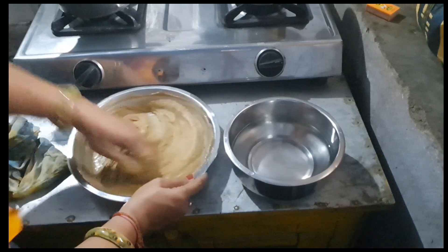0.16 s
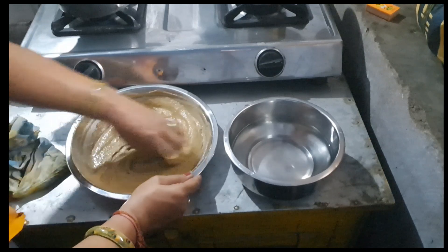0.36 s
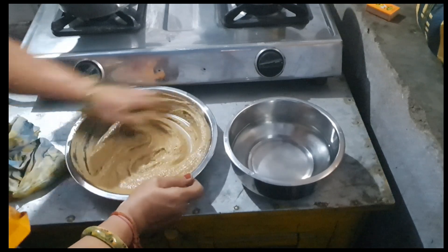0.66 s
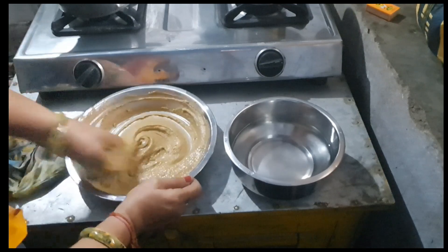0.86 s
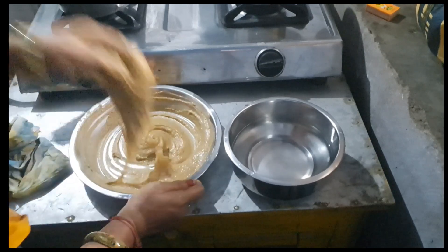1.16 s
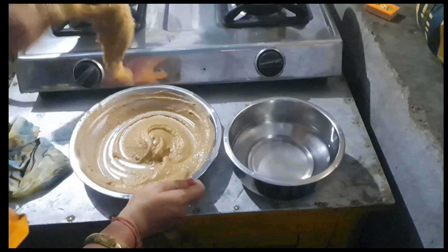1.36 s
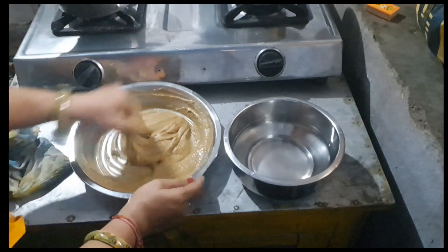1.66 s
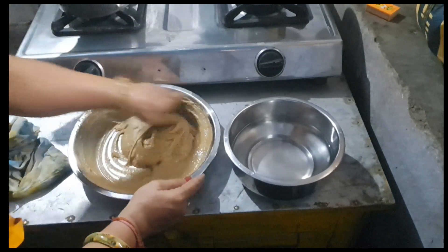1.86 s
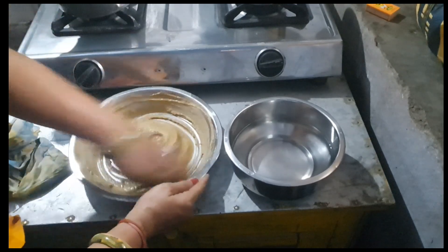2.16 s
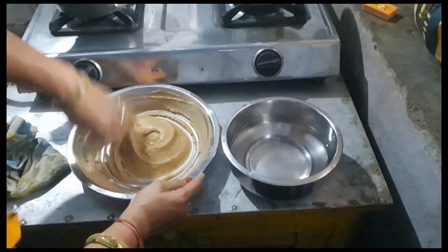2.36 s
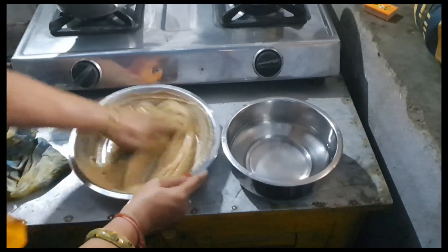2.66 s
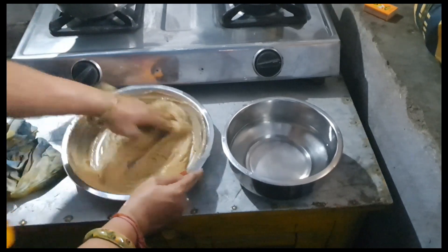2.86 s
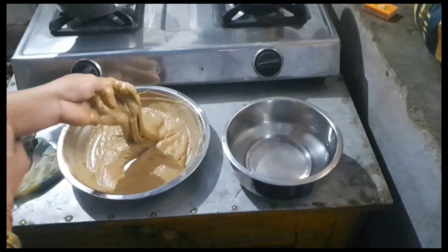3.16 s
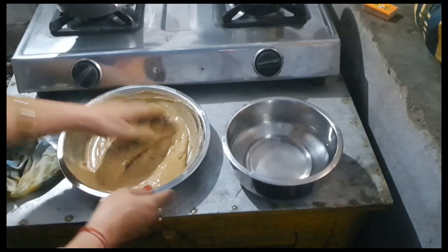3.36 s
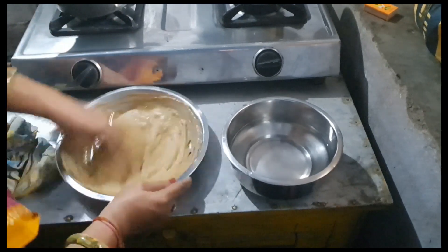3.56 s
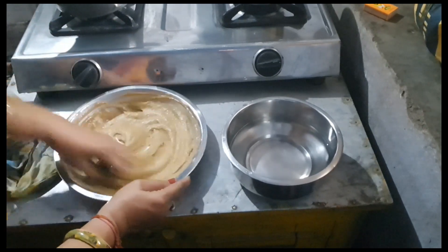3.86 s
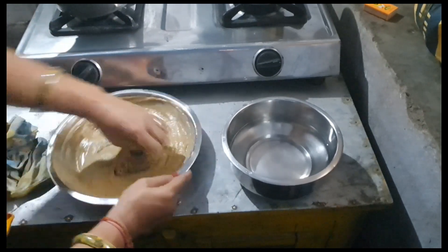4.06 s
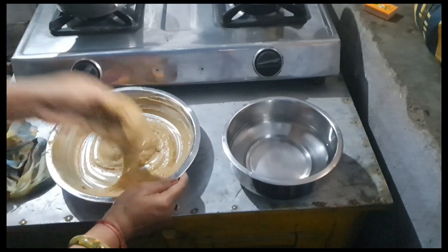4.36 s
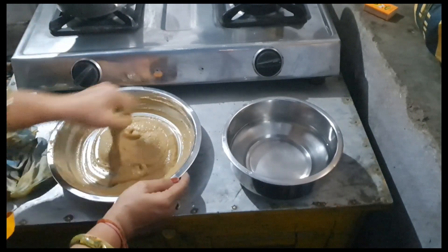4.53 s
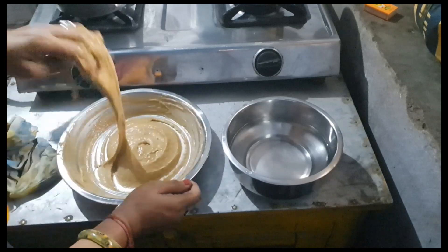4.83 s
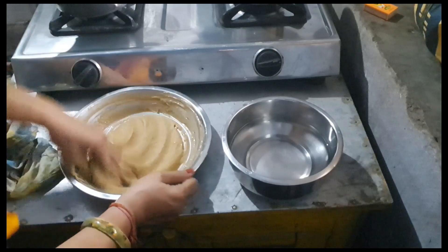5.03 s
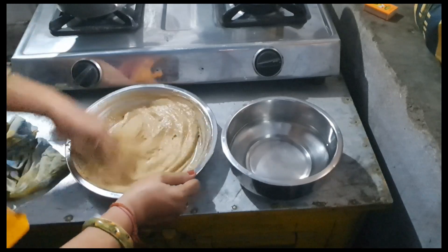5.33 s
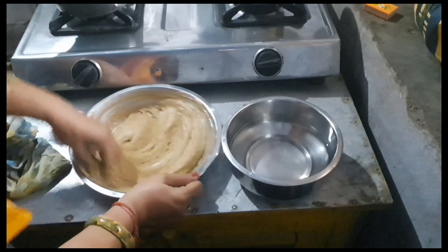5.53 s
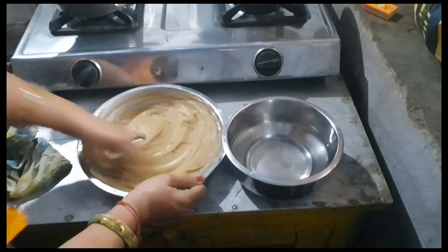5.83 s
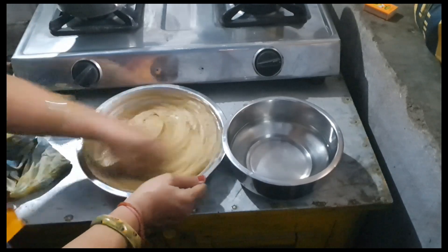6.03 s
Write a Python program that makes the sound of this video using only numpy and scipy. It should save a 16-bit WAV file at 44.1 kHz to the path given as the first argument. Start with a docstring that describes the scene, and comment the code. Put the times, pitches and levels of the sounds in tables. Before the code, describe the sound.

A hand works thick, wet batter in a steel bowl on a counter, heard close in stereo in a small, hard kitchen with faint room air. From 0 s soft plops, folds and thumps accompany a squishy, crackling stir. Around 1 s a deep gulping plop meets a bright, ringing steel knock with a low hollow swell. At 1.6-1.8 s sharp wet slaps crack and splatter with a heavy thud. Quieter stirring follows until another slap at 2.6 s, then quick thumps, plops and small bubble pops to 3 s. Hollow folds gulp near 3.4 s. At 4.1 s a hard slap and a duller, shorter clank land together, followed by strong slaps near 4.55 and 5 s with rounded plops. From 5.1 s fast, even strokes continue, with low bowl thumps about every tenth of a second, sticky squelches, a crisp tear near 5.8 s and gentler pops around 6 s.

```python
"""A kitchen counter: a hand beats thick batter in a steel bowl before two microphones in a small hard room.
Lumps land with wet slaps built of shaped noise; air pockets plop under the strokes as gliding sines.
The bowl thumps and clanks on the counter as decaying modes, a low drone swells three times, and the
stirred batter rumbles, squishes and crackles in noise, with small bubbles bursting as short resonances.
Still room air lies behind; the right microphone stands about four centimetres farther away."""
import sys
import numpy as np
from scipy import signal
from scipy.fft import rfft, irfft, next_fast_len
from scipy.io import wavfile

SR = 44100
rng = np.random.default_rng(int(sys.argv[2]) if len(sys.argv) > 2 else 0)


def int16_out(signal):
    """Quantize to a 16-bit WAV file."""
    q = np.round(np.clip(np.atleast_2d(signal).T, -1, 1) * 32767)
    wavfile.write(sys.argv[1], SR, q.astype(np.int16))


N = 272979
TIME = np.arange(N) / SR
AGE = TIME[:SR // 2]  # seconds since the onset of a single sound

# Event and stirring levels are faders ahead of the trims in each function.
# batter slapped into the bowl: (time [s], thud level [dB], thud pitch [Hz], air pocket level [dB],
# pocket pitch [Hz], clap level [dB], clap tilt [dB per octave], spray level [dB], first crack level [dB])
SLAPS = [(1.637, -30.5, 252, -36, 254, -25.5, 1, -36.5, -22.5),
         (1.651, -25.5, 121, -20.5, 730, -25.5, 0, -33, -25),
         (1.814, -36.5, 227, -22.5, 354, -31.5, 6, -36, -24),
         (2.577, -32, 138, -17.5, 265, -26.5, 14, -34, -31),
         (2.623, -43, 263, -18, 363, -29.5, -1, -33.5, -24),
         (4.077, -23.5, 269, -15, 351, -24, 15, -29, -24.5),
         (4.09, -26, 236.4, -20.5, 258, -30.5, 3, -42, -32),
         (4.552, -28, 270, -11.5, 332, -28.5, 18, -32, -30),
         (4.563, -19, 122.7, -16.5, 303, -24, 7, -35, -33),
         (4.975, -26, 266, -10.5, 298, -30.5, -10, -30, -18)]
# air let out from under a lump: (frequency [Hz], level [dB per Hz])
GULP_SPECTRUM = [(190, 3.5), (290, -3.5), (390, -0.5), (520, -0.5), (730, -9.5), (1000, -10.5)]
# slap clap, and the spray of droplets: (frequency [Hz], level [dB per Hz])
CLAP_SPECTRUM = [(300, -19), (520, -2), (720, 6), (1300, 0.5), (2100, -3.5), (3000, -10.5), (5000, -57)]
SPRAY_SPECTRUM = [(1500, -1.5), (3000, 1), (5500, 2.5), (7500, -7.5), (9500, -13), (12000, -5.5),
                  (16000, -13.5)]
# decay times, long at first and short later: (time [s], decay time factor [ratio])
DECAY_FACTOR = [(1.6, 2.5), (1.9, 1.65), (2.6, 0.62), (4.1, 0.53), (5.0, 0.54)]
SLAP_T60_S = 0.13  # at decay factor 1
AFTER_RUMBLE_RE_THUD_DB, AFTER_RUMBLE_T60_S = -8.5, 0.66  # t60 at decay factor 1

# forward strokes closing on air: (time [s], large pocket level [dB], its nominal pitch [Hz],
# small pocket level [dB], smack level [dB])
PLOPS = [(0.002, -31, 424, -21, -32), (0.04, -31, 404, -31, -38.5), (0.304, -30.5, 393, -51, -49),
         (0.358, -36, 366, -38, -42), (0.959, -13.5, 356, -37, -42), (0.968, -24, 313, -20.5, -34),
         (0.995, -20, 400, -42, -46), (1.7, -16.5, 272, -30, -34.5), (2.446, -30, 380, -54, -44),
         (2.717, -32, 367, -26, -37), (2.811, -39, 397, -27, -34), (2.915, -30, 380, -26, -29.5),
         (3.02, -20.5, 397, -33, -30.5), (3.546, -25.5, 424, -21, -31), (3.784, -21.5, 423, -30.5, -42.5),
         (3.864, -23.5, 433, -27, -36.5), (3.961, -23, 408, -38, -42.5), (4.294, -23, 295, -40, -41.5),
         (4.354, -16.5, 338, -40, -46), (4.453, -36, 269, -32, -42.5), (4.673, -27.5, 384, -30, -45),
         (5.026, -18, 379, -29, -41.5), (5.061, -26.5, 250, -40, -51), (5.124, -21, 426, -26, -40),
         (5.216, -21.5, 404, -23.5, -38.5), (5.306, -25.5, 422, -41, -49), (6.133, -38, 402, -34, -37.5)]
# smack of a closing stroke: (frequency [Hz], level [dB per Hz])
SMACK_SPECTRUM = [(400, 12.5), (750, 2), (1200, -3), (2000, -8), (3200, -16.5), (6000, -18.5),
                  (12000, -40.5)]
PLOP_T60_S, PLOP_DECAY_POWER = 0.079, 0.35  # t60 at decay factor 1
SMALL_POCKET_HZ, SMALL_POCKET_T60_S = 626, 0.026  # the pitch it settles to

# batter folding over softly: (time [s], hollow level [dB], nominal hollow pitch [Hz], squish level [dB])
FOLDS = [(0.02, -26, 380, -40), (0.159, -32, 383, -48), (0.51, -41, 315, -47), (0.675, -33, 360, -45.5),
         (3.34, -21, 355, -43), (3.363, -17, 349, -42.5), (3.465, -35, 323, -42.5), (5.387, -29, 395, -45),
         (5.494, -39, 371, -46), (5.991, -53, 294, -47), (6.036, -45, 288, -46.5), (6.125, -29, 461, -43.5)]

# return strokes pressing the bowl down: (time [s], thump level [dB], pitch [Hz], tearing level [dB])
THUMPS = [(0.01, -32, 129, -40), (0.2, -36, 115, -58), (0.306, -38.5, 83, -39.5), (0.699, -36.5, 120, -42),
          (1.087, -25.5, 117, -48), (1.676, -18, 115, -26), (1.702, -26, 109, -27), (2.122, -31, 116, -59),
          (2.148, -33, 129.7, -49), (2.458, -39.5, 177, -52), (2.594, -32, 159, -50),
          (2.667, -34, 151, -31.5), (2.758, -28.5, 125, -40), (2.86, -29.5, 113, -36),
          (2.97, -36.5, 119, -39), (3.595, -28, 117.4, -34), (4.13, -21.5, 109, -30.5),
          (4.405, -36.5, 137, -43), (5.367, -28.5, 125.4, -38), (5.454, -26.5, 128.4, -35.5),
          (5.556, -24, 118, -32), (5.657, -30, 135, -35), (5.758, -26.5, 136, -36),
          (5.866, -39.5, 127, -37.5), (6.072, -30.5, 143, -39), (6.174, -31.5, 170, -34.5)]
# loaded bowl on the counter: (multiple of the thump pitch [ratio], level [dB], t60 at full length [s])
COUNTER_MODES = [(.62, 5, 0.014), (0.999, 1, 0.18), (1.5, -7, 0.11), (2.1, -6, 0.0766), (2.7, -7, 0.064)]

# films of batter tearing between strokes: (time [s], level [dB])
SQUELCHES = [(0.076, -42), (0.71, -37), (1.977, -41), (2.16, -39), (2.412, -41), (3.072, -44.5),
             (3.678, -44), (3.7326, -35), (3.9925, -32.5), (4.2378, -37.5), (4.7709, -40.5), (5.153, -35.5),
             (5.7667, -27), (5.817, -36), (5.9218, -36), (6.0532, -40), (6.122, -39)]
# tearing film: (frequency [Hz], level [dB per Hz])
TEAR_SPECTRUM = [(1500, 2.5), (3000, 2), (5200, 5), (7500, -3.5), (9500, -11), (12000, -4), (16000, -7)]
TEAR_T60_S, TEAR_SQUISH_DB = 0.069, -3.5

# large bubbles bursting: (time [s], level [dB], pitch [Hz])
POPS = [(2.668, -27, 700), (2.858, -31, 814), (2.861, -31, 1850), (4.676, -39, 950), (6.0, -37, 1070),
        (6.036, -33, 820), (6.057, -31, 1470)]

# knocks on the steel counter: (time [s], overall level [dB], crack level within the knock [dB])
CLANKS = [(1.08, -6, -5), (4.09, -4, -30)]
# steel bowl modes: (frequency [Hz], level [dB], t60 at full length [s])
BOWL_MODES = [(752, 14, 0.3), (871, -14, .28), (946, 3.5, 0.25), (1121, 13, 0.18), (1260, 11.5, 0.24),
              (1340, 6, 0.18), (1550, -14.5, 0.34), (1715, -5, 0.54), (1910, -22, .25), (2150, 10, 0.4),
              (2060, -9, 0.78), (2290, -29, 0.27), (2200, -6, 0.17), (2340, -28, 0.19), (2765, 4, 0.25),
              (3100, -15, 0.12), (3500, 7, 0.22), (4090, -24, 0.4), (4250, -21, 0.16), (5640, 0, 0.2)]

# stirring: (time [s], rumble level [dB], squish level [dB], crackle level [dB])
STIR = [(0.0, -50, -46.5, -54.5), (0.62, -56, -52.5, -55), (1.1, -46, -45.5, -50.5),
        (1.38, -54.5, -55, -56.5), (1.67, -68, -48.5, -52), (1.83, -53, -50, -60),
        (2.12, -59, -51.5, -58.5), (2.46, -53, -53, -57), (2.84, -58, -46, -55.5), (3.07, -85, -58.5, -56),
        (3.33, -61, -57.5, -58.5), (3.59, -44.5, -45.5, -51), (4.02, -59, -53, -57.5),
        (4.21, -47, -61, -60), (4.46, -46.5, -54, -59), (4.81, -59, -58, -63.5), (5.45, -52, -51.5, -55.5),
        (6.19, -50.5, -50.5, -54)]
# low rumble, wet squish and fine crackle: (frequency [Hz], level [dB per Hz])
RUMBLE_SPECTRUM = [(35, -25), (55, -6), (85, -4), (120, 3.5), (170, -6), (250, -4.5), (450, -46)]
SQUISH_SPECTRUM = [(250, 5.5), (500, 3.5), (900, -3), (1500, -6.5), (2300, -5.5), (3500, -15.5),
                   (6000, -25.5)]
CRACKLE_SPECTRUM = [(1500, -8), (3000, -3.5), (4000, -3.5), (5200, 1.5), (7000, -9.5), (9300, -18.5),
                    (12000, -8.5), (16000, -11.5)]
RUMBLE_TRIM_DB, SQUISH_TRIM_DB, CRACKLE_TRIM_DB = 2, 0.5, 2.5
# landings of flung lumps, with the hand in the air just before: (time [s])
FLINGS = [1.637, 2.577, 4.076, 4.552, 4.975]
LIFT_S, LIFT_DIP_DB = 0.084, -4.5

# swells of the low drone: (peak time [s], peak level [dB], swell [dB per s])
DRONE_SWELLS = [(1.11, -33.5, 46), (1.85, -46, 400), (3.37, -43.5, 600)]
DRONE_HZ, DRONE_WIDTH_HZ, DRONE_DECAY_DB_PER_S = 329, 54, 52.5
DRONE_RE_STIR_RUMBLE_DB = -14  # against the rumble column of STIR

# hard surfaces close by: (delay [s], level [dB])
SURFACES = [(.0056, -43.5), (0.0131, -15), (0.0177, -20.5)]
# room tail: (frequency [Hz], t60 [s])
KITCHEN_T60 = [(100, 0.27), (400, 0.25), (2000, 0.2), (8000, 0.19), (16000, 0.089)]
# still room air: (frequency [Hz], level [dB per Hz])
AIR_SPECTRUM = [(18, -42), (30, 12), (221, -14), (355, -13), (426, -39), (632, 15.5), (801, -48),
                (2170, -4), (2980, -9), (4910, -0.5), (8980, -15.5), (11700, -9), (16000, -12.5)]
AIR_DB = -57

# how alike the two microphones hear noise: (frequency [Hz], likeness [0-1])
LIKENESS = [(60, 0.9), (150, 1), (300, 0.88), (640, .5), (1400, 0.09), (16000, 0)]
# microphone colour: (frequency [Hz], left minus right [dB])
BALANCE = [(60, 0), (200, -2), (380, -2), (700, 1), (2400, 1), (4400, 6.5), (8100, -12), (11000, -6),
           (15000, 2.5)]
MIC_LAG_S = 0.00011  # extra travel to the right microphone
CUTOFF_HZ = 16000


def slaps():
    """Crack, clap, droplet spray, air gulp and heavy thud of a landing lump sound together."""
    out = np.zeros((2, N))
    for s, thud_db, thud_hz, pocket_db, pocket_hz, clap_db, tilt, spray_db, crack_db in SLAPS:
        decay = decay_factor(s)
        # a flat hit is bright, a cupped one dull
        colour = [(hz, db + tilt * np.log2(hz)) for hz, db in CLAP_SPECTRUM]
        clap_shape = fade(SLAP_T60_S * decay, rise=0.00045) * grains(437, 5.4)
        clap = from_db(clap_db - 1) * noise(colour) * clap_shape
        spray_shape = fade(SLAP_T60_S * decay) * grains(678, 4.1)
        spray = from_db(spray_db + 2) * noise(SPRAY_SPECTRUM) * spray_shape
        crack = from_db(crack_db) * noise(SPRAY_SPECTRUM) * fade(0.023, rise=0.0001)
        air = from_db(pocket_db - 1) * pocket(pocket_hz, 0.062, glide=0.66, settle=0.0022)
        gulp = from_db(pocket_db - 6) * noise(GULP_SPECTRUM) * fade(0.21 * decay, rise=0.00096)
        weight = from_db(thud_db + 4) * thud(thud_hz, length=0.82)
        rumble_shape = fade(AFTER_RUMBLE_T60_S * decay, rise=0.0043)
        counter = from_db(thud_db + AFTER_RUMBLE_RE_THUD_DB) * noise(RUMBLE_SPECTRUM) * rumble_shape
        bowl = from_db(clap_db - 12.5) * steel(0.38 * decay, tilt_db=-11.5)
        add(out, s, crack + clap + spray + air + gulp + weight + counter + bowl)
    return out


def plops():
    """Each stroke smacks shut on a large and a small pocket of air and nudges the base of the bowl."""
    out = np.zeros((2, N))
    for s, pocket_db, hz, small_db, smack_db in PLOPS:
        # smack and large pocket ring longer early on
        t60 = PLOP_T60_S * decay_factor(s) ** PLOP_DECAY_POWER
        smack_shape = 0.75 * fade(t60 * 1.79, rise=0.00038) + 0.99 * fade(0.0081, rise=0.0001)
        smack = from_db(smack_db + 8) * noise(SMACK_SPECTRUM) * smack_shape * grains(304, 3.13)
        large = from_db(pocket_db - 6) * pocket(hz * 0.95, t60, glide=0.22, settle=0.0027)
        blip = pocket(SMALL_POCKET_HZ, SMALL_POCKET_T60_S, glide=0.71, settle=0.002)
        base = from_db(pocket_db - 5.5) * ring(245, 0.035, rise=0.0023)
        add(out, s, smack + large + from_db(small_db) * blip + base)
    return out


def folds(build=0.012, t60=0.12):
    """A sheet of batter rolls over and squeezes air out of the hollow beneath it."""
    out = np.zeros((2, N))
    for s, hollow_db, hz, squish_db in FOLDS:
        hollow = from_db(hollow_db - 4) * pocket(hz * 0.97, 0.12, glide=0.12, settle=0.0095)
        squish = from_db(squish_db + 12.5) * noise(SQUISH_SPECTRUM) * fade(t60) * grains(303, 0.7)
        add(out, s, (hollow + squish) * (1 - np.exp(-AGE / build)))
    return out


def thumps():
    """The return stroke pushes the bowl down on the counter and tears batter off the fingers."""
    out = np.zeros((2, N))
    for s, thump_db, hz, tear_db in THUMPS:
        add(out, s, from_db(thump_db + 1.5) * thud(hz) + from_db(tear_db) * tearing())
    return out


def squelches():
    """Batter tears off the lifted fingers without moving the bowl."""
    out = np.zeros((2, N))
    for s, tear_db in SQUELCHES:
        add(out, s, from_db(tear_db) * tearing())
    return out


def pops(t60=0.027):
    """A large bubble rises in pitch as it opens."""
    out = np.zeros((2, N))
    for s, db, hz in POPS:
        add(out, s, from_db(db) * pocket(hz, t60, glide=-0.13, settle=0.0034))
    return out


def clanks():
    """A hard knock: bright crack, dense clatter and bowl ring, the later one decaying faster."""
    clatter_spectrum = [(500, -5.5), (850, -5.5), (1200, 4), (1600, 1), (2200, 3), (3000, -6), (6000, -37)]
    rim_spectrum = [(1800, -5), (2150, -2), (2500, -10)]  # rings on near two kilohertz
    out = np.zeros((2, N))
    for s, knock_db, crack_db in CLANKS:
        decay = decay_factor(s) / decay_factor(0)
        crack_shape = fade(0.019) + from_db(-14) * fade(0.28 * decay)
        crack = from_db(crack_db) * noise(SPRAY_SPECTRUM) * crack_shape
        clatter = from_db(-10.5) * noise(clatter_spectrum) * fade(0.27 * decay) * grains(288, 2)
        rim = from_db(-26.5) * noise(rim_spectrum) * fade(0.59 * decay, rise=0.0092)
        bowl = from_db(-24) * steel(0.23 * decay, tilt_db=2)
        add(out, s, from_db(knock_db) * (crack + rim + clatter + bowl))
    return out


def bubbles(per_s=120, cycles=9, spread_db=4, count=14):
    """Beaten-in bubbles burst as tiny resonances, more often and louder where the stirring squishes more."""
    _, squish_db, _ = in_time(STIR)
    born = rng.random(N) < per_s * from_db(squish_db - squish_db.mean()) / SR
    strength = contact() * from_db(squish_db + spread_db * np.minimum(rng.exponential(1, N), 2))
    dealt = rng.integers(0, count, N)
    out = np.zeros((2, N))
    for k, hz in enumerate(np.geomspace(700, 4500, count)):
        radius = from_db(-60 * hz / (cycles * SR))  # falls 60 dB in the given cycles
        angle = 2 * np.pi * hz / SR
        bursts = born * (dealt == k) * strength + 1e-18
        resonator = [1, -2 * radius * np.cos(angle), radius * radius]
        popping = signal.lfilter([0, np.sin(angle)], resonator, bursts)
        # each size has its own place between the microphones
        out += [popping, np.roll(popping, rng.integers(0, 30))]
    return out


def stirring():
    """The hand ploughs through the batter: noise bands of rumble, grainy squish and crackle."""
    rumble_db, squish_db, crackle_db = in_time(STIR)
    rumble = from_db(rumble_db + RUMBLE_TRIM_DB) * noise(RUMBLE_SPECTRUM, N)
    squish = from_db(squish_db + SQUISH_TRIM_DB) * noise(SQUISH_SPECTRUM, N) * grains(120, 3.5, N)
    crackle = from_db(crackle_db + CRACKLE_TRIM_DB) * noise(CRACKLE_SPECTRUM, N) * grains(1100, 1.5, N)
    return contact() * (rumble + squish + crackle)


def droning():
    """Noise through one resonance: a faint drone along with the rumble, swelling at three moments."""
    rumble_db, _, _ = in_time(STIR)
    level = from_db(rumble_db + DRONE_RE_STIR_RUMBLE_DB)
    for s, peak_db, swell_db_per_s in DRONE_SWELLS:
        drop_db = np.maximum(swell_db_per_s * (s - TIME), DRONE_DECAY_DB_PER_S * (TIME - s))
        level = level + from_db(peak_db - drop_db)
    resonance = signal.iirpeak(DRONE_HZ, DRONE_HZ / DRONE_WIDTH_HZ, SR)
    drone = signal.lfilter(*resonance, noise([(230, 0), (480, 0)], N))
    return level * rms_one(drone)


def kitchen(x, near_db=-9, tail_db=-17):
    """Echoes off stove, counter and wall, scatter from the pots, then the tail of a small hard room."""
    wash = noise([(60, 0), (16000, 0)])
    edges = np.geomspace(50, 17000, 9)
    tail = 0
    for low, high in zip(edges, edges[1:]):
        band_pass = signal.butter(2, [low, high], "band", fs=SR, output="sos")
        t60 = at_hz(KITCHEN_T60, np.sqrt(low * high))
        tail = tail + signal.sosfilt(band_pass, wash) * fade(t60, rise=0.0052)
    near = noise([(500, 14), (3000, 12.5), (16000, 5.7)]) * fade(0.039, rise=0.0016)
    echoes = (from_db(near_db) * rms_one(near) + from_db(tail_db) * rms_one(tail)) / np.sqrt(len(AGE))
    dull = signal.lfilter(*signal.butter(1, 1200, fs=SR), AGE == 0)  # a softened impulse
    for delay, db in SURFACES:
        add(echoes, delay, from_db(db) * dull)
    return signal.fftconvolve(x, echoes, axes=1)[:, :N]


def still_air():
    """Steady shaped noise of the quiet room."""
    return from_db(AIR_DB) * noise(AIR_SPECTRUM, N)


def thud(hz, length=1):
    """The soft, heavy blow rocks the bowl on the counter."""
    return sum(from_db(db) * ring(hz * ratio, t60 * length, rise=0.0021) for ratio, db, t60 in COUNTER_MODES)


def pocket(hz, t60, glide=0.7, settle=0.005):
    """Trapped air rings, its pitch settling as the hollow opens: down for positive glide, up for negative."""
    pitch = hz * (1 + glide * np.exp(-AGE / settle))
    return np.sin(2 * np.pi * np.cumsum(pitch) / SR) * fade(t60, rise=0.0016)


def steel(length, tilt_db):
    """Bowl modes, phased anew per blow and microphone; a negative tilt (dB per octave) favours the low ones."""
    phases = rng.uniform(0, 2 * np.pi, (len(BOWL_MODES), 2, 1))
    out = 0
    for (hz, db, t60), phase in zip(BOWL_MODES, phases):
        strength = from_db(db + tilt_db * np.log2(hz / BOWL_MODES[0][0]))
        out = out + strength * np.sin(2 * np.pi * hz * AGE + phase) * fade(t60 * length)
    return out


def tearing():
    """A film of batter snaps and tears in a short grainy burst over a low squish."""
    tear_shape = fade(TEAR_T60_S, rise=0.0011) + 0.8 * fade(0.012, rise=0.0001)
    tear = from_db(-7.5) * noise(TEAR_SPECTRUM) * tear_shape
    squish = from_db(TEAR_SQUISH_DB) * noise(SQUISH_SPECTRUM) * fade(TEAR_T60_S * 1.3, rise=0.0031)
    return (tear + squish) * grains(900, 4.3)


def contact():
    """Gain of the stirring: it dips while the hand is out of the batter."""
    lift = [-1.3 * LIFT_S, -0.8 * LIFT_S, 0, 0.5 * LIFT_S]
    airborne = sum(np.interp(TIME - s, lift, [0, 1, 1, 0]) for s in FLINGS)
    return from_db(LIFT_DIP_DB * airborne)


def decay_factor(s):
    """Factor on decay times at time s: long at first, short later."""
    return max(np.interp(s, *np.transpose(DECAY_FACTOR)), 0.1)


def ring(hz, t60, rise=0.00044):
    """One struck mode."""
    return np.sin(2 * np.pi * hz * AGE) * fade(t60, rise)


def fade(t60, rise=0.0003):
    """Quick rise, exponential decay."""
    return (1 - np.exp(-AGE / max(rise, 1e-5))) * np.exp(-np.log(1000) * AGE / max(t60, 0.002))


def grains(per_s, spread_db, size=len(AGE)):
    """Uneven gain of many small wet bursts; rms 1."""
    steps = np.arange(size) * per_s / SR
    levels = np.clip(rng.standard_normal(size // 10), -2.5, 2.5)
    return rms_one(from_db(spread_db * np.interp(steps, np.arange(len(levels)), levels)))


def noise(spectrum, size=len(AGE)):
    """Stereo noise with steep skirts, alike in the bass and unrelated in the treble; rms 1."""
    padded = next_fast_len(size, True)
    hz = np.fft.rfftfreq(padded, 1 / SR)
    mid, side = rfft(rng.standard_normal((2, padded)))
    alike = np.clip(at_hz(LIKENESS, hz), 0, 1)
    low_skirt = np.minimum(hz / spectrum[0][0], 1) ** 2
    high_skirt = np.maximum(hz / spectrum[-1][0], 1) ** 2
    pair = np.sqrt(1 + alike) * mid + np.sqrt(1 - alike) * side * [[1], [-1]]
    shaped = pair * from_db(at_hz(spectrum, hz)) * low_skirt / high_skirt
    return rms_one(irfft(shaped, padded)[:, :size])


def from_db(db):
    """Decibels to gain."""
    return 10 ** (np.asarray(db) / 20)


def rms_one(x):
    """Scale to unit rms."""
    return x / np.sqrt(np.mean(x ** 2) + 1e-20)


def in_time(rows):
    """Each column of a curve at every sample."""
    s, *columns = np.transpose(rows)
    return [np.interp(TIME, s, c) for c in columns]


def at_hz(points, hz):
    """Read a table on a log-frequency axis."""
    points = np.array(points)
    return np.interp(np.log(hz + 1), np.log(points[:, 0] + 1), points[:, 1])


def add(out, s, sound):
    """Mix a sound in at time s."""
    start = max(round(s * SR), 0)
    out[:, start:start + sound.shape[-1]] += sound[..., :out.shape[1] - start]


def scene():
    """Blows and bubbles sound in the kitchen, over stirring, droning and still air."""
    blows = slaps() + plops() + folds() + thumps() + squelches() + pops() + clanks()
    blows = blows + from_db(2.5) * bubbles()
    # a high-pass at 45 Hz keeps the blows free of deep bass
    blows = signal.sosfilt(signal.butter(2, 45, "high", fs=SR, output="sos"), blows + 1e-18)
    return blows + kitchen(blows) + stirring() + droning() + still_air()


def record(dry):
    """Each microphone has its own colour, the right one hears later; peaks are rounded and the top is cut."""
    size = next_fast_len(N + 1000, True)
    hz = np.fft.rfftfreq(size, 1 / SR)
    colour = from_db(at_hz(BALANCE, hz) * np.array([[0.5], [-0.5]]))
    lag = np.exp(-2j * np.pi * hz * MIC_LAG_S * np.array([[0], [1]]))
    heard = irfft(rfft(dry, size) * colour * lag, size)[:, :N]
    low_pass = signal.ellip(10, 0.2, 70, CUTOFF_HZ, fs=SR, output="sos")
    return signal.sosfilt(low_pass, 0.97 * np.tanh(heard / 0.85))


dry = scene()
out = record(dry)
int16_out(out)
```